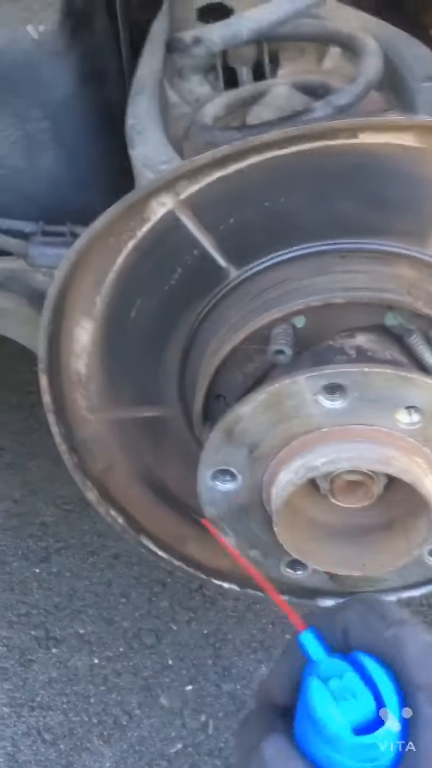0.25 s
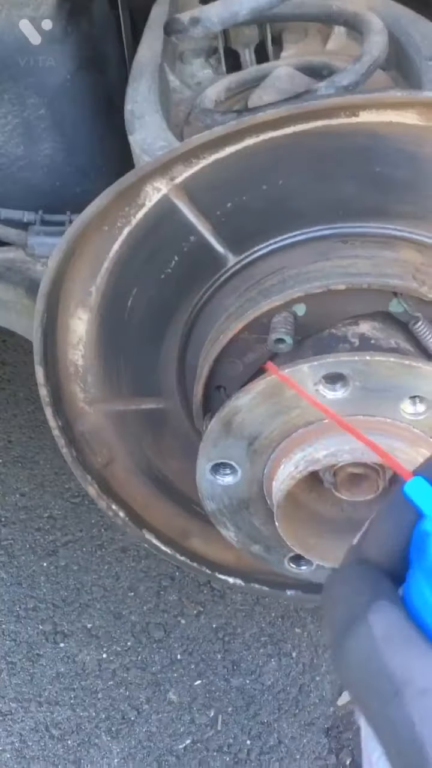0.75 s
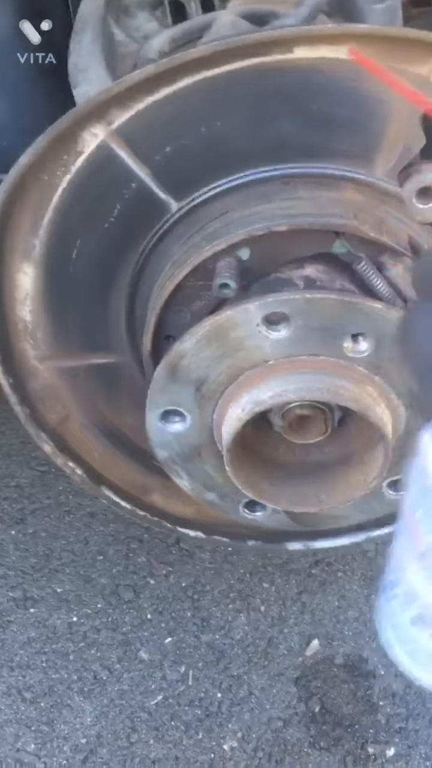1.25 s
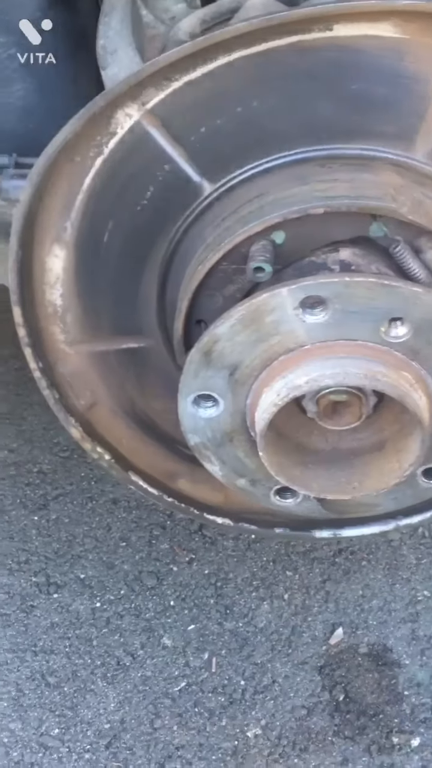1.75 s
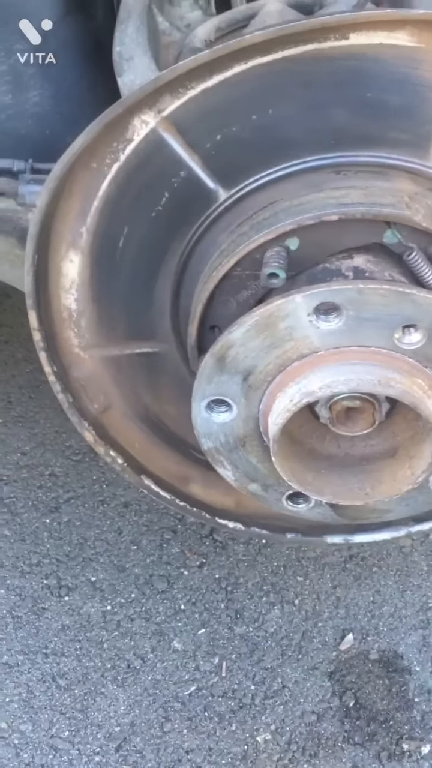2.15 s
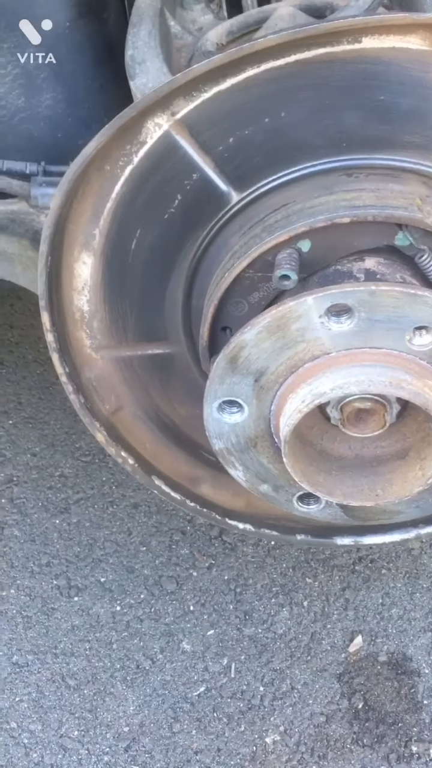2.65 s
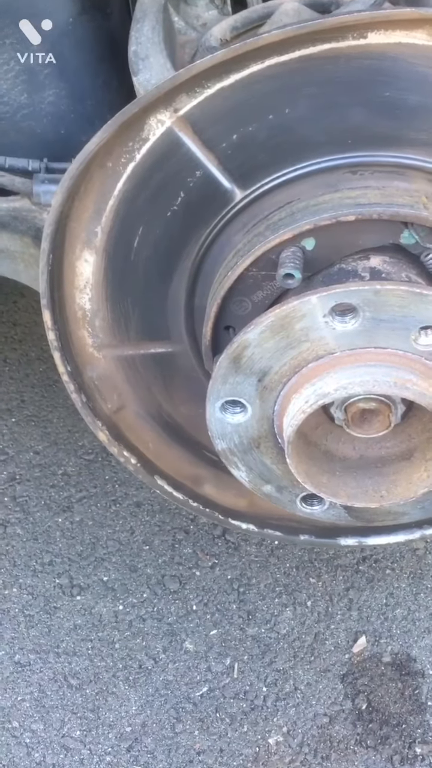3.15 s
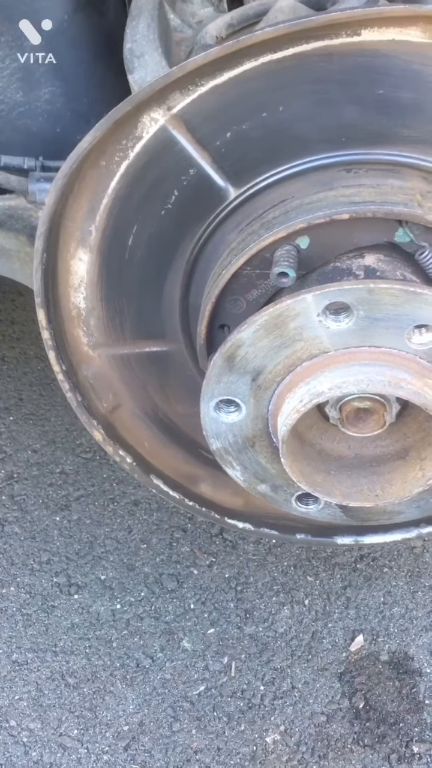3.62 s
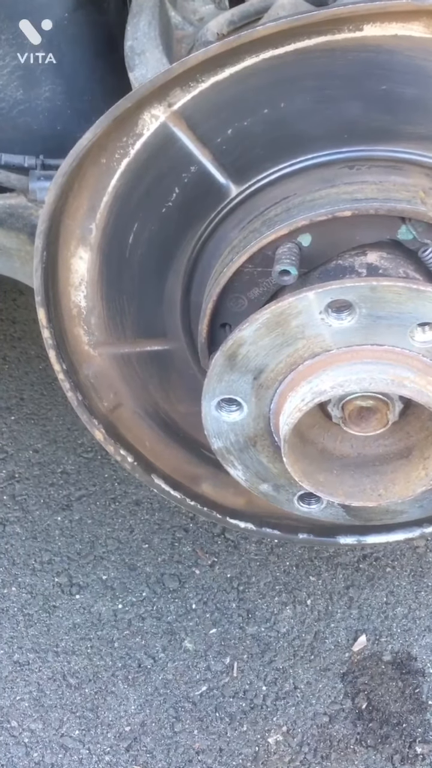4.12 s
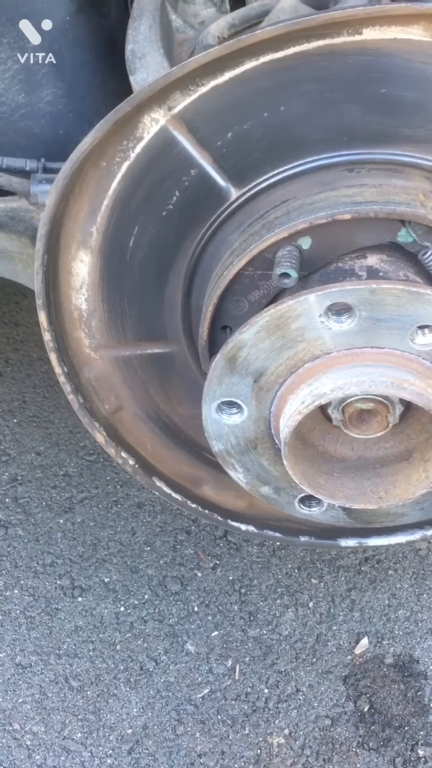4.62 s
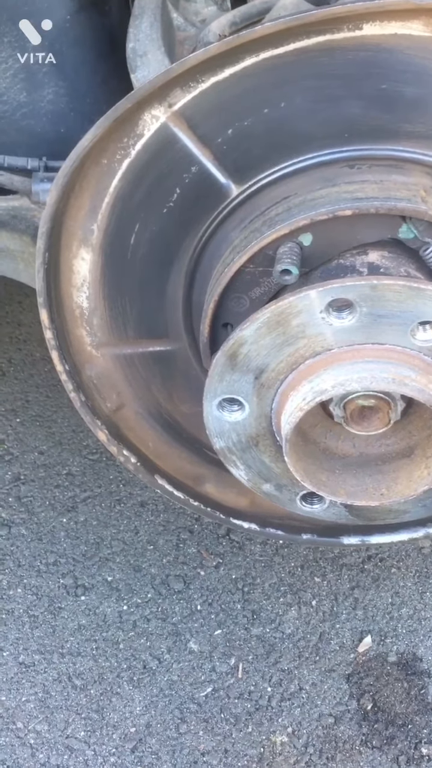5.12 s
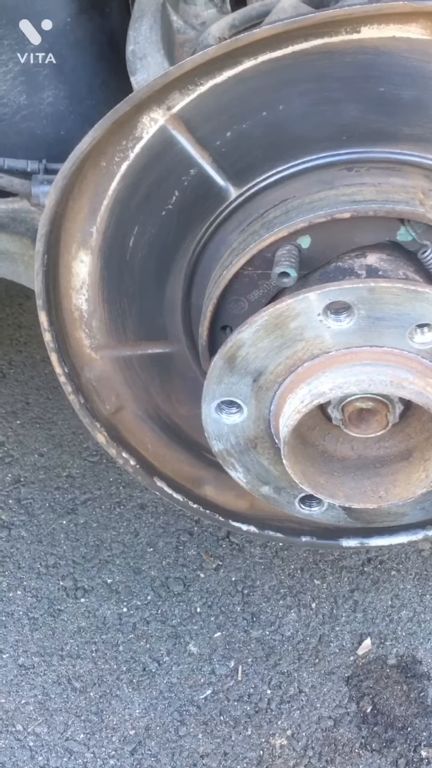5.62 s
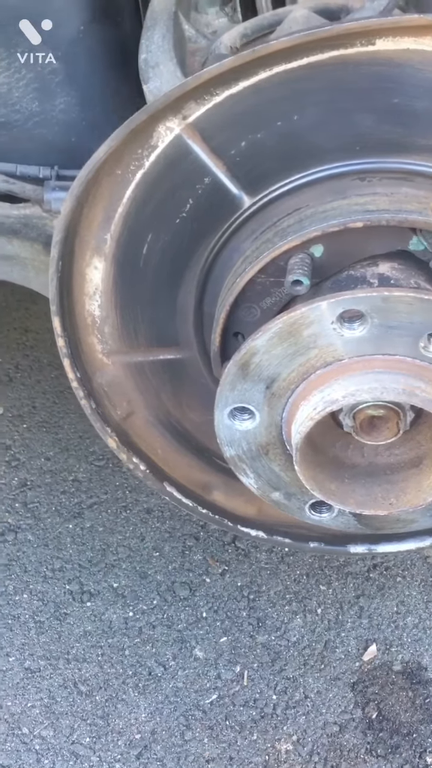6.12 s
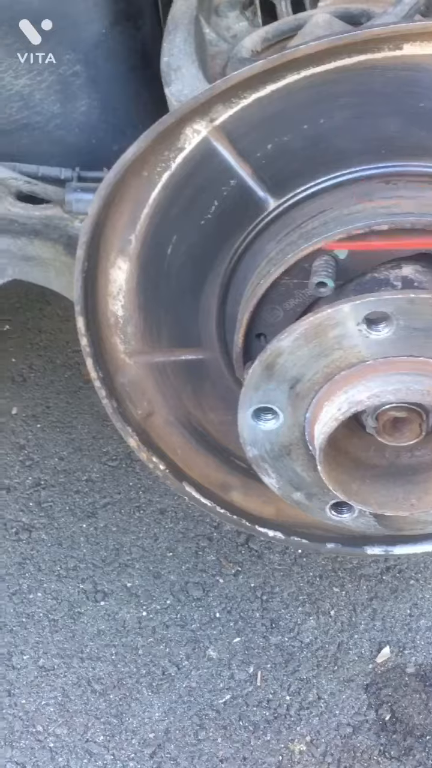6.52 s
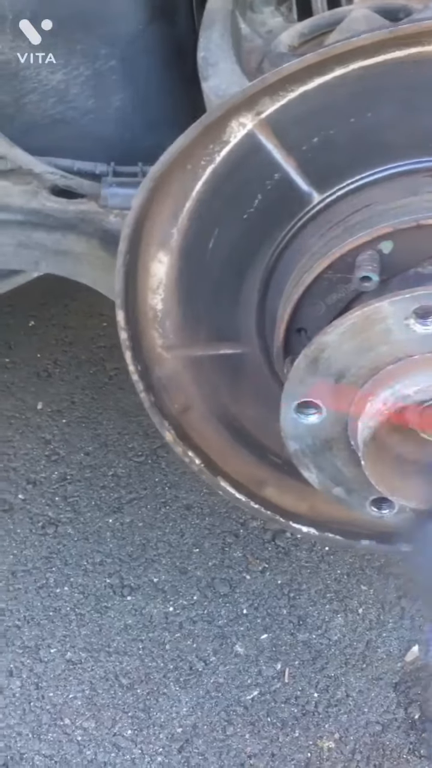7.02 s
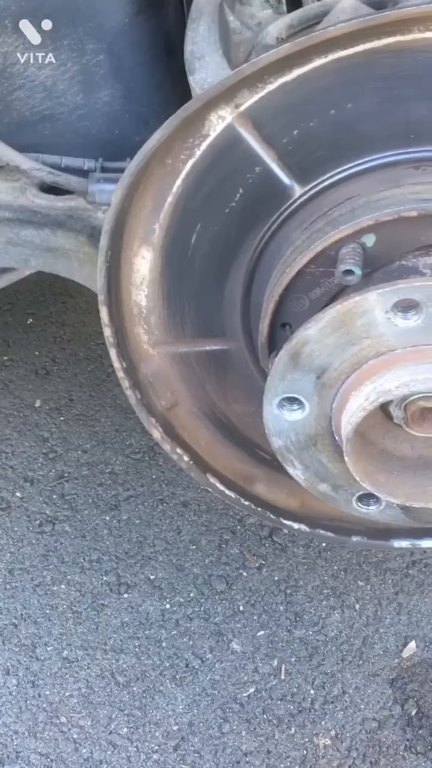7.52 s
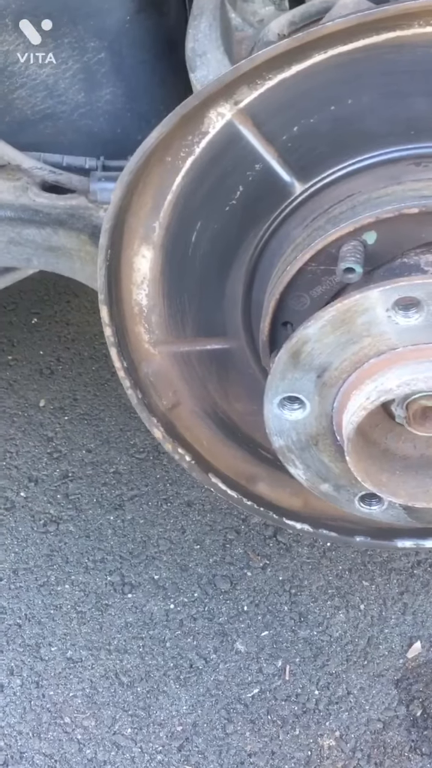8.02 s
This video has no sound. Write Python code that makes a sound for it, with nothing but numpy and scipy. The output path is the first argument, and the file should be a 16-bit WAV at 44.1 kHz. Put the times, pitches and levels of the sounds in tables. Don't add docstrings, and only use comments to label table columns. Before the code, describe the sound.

Close, loud spray can jets in quick rhythmic bursts, scouring and whistling in a metal drum, then a longer final blast over faint traffic.

```python
import sys
import numpy as np
from scipy import signal
from scipy.fft import rfft, irfft, next_fast_len
from scipy.io import wavfile
from scipy.ndimage import uniform_filter1d, map_coordinates

SR = 44100
rng = np.random.default_rng(int(sys.argv[2]) if len(sys.argv) > 2 else 0)


def level_to_linear(level):
    exponent = np.asarray(level, float) / 20
    return 10 ** exponent


def bounce(signal):
    frames = np.transpose(np.atleast_2d(signal))
    limited = np.clip(frames, -1, 1)
    pcm = np.round(limited * 32767).astype(np.int16)
    wavfile.write(sys.argv[1], SR, pcm)


N = 364266
TIME = np.arange(N) / SR

# [t/s, f/Hz,
# level/dB]
MODES = [(.14, 869, -61), (.75, 950, -59), (.75, 2363, -63), (1.08, 869, -58), (1.08, 2411, -66),
         (1.41, 2411, -65), (1.74, 1036, -60), (1.74, 1394, -60), (1.74, 3267, -58), (1.74, 2720, -61),
         (1.74, 2950, -64), (2.1, 2815, -54), (2.1, 8268, -69), (2.1, 15057, -73), (2.85, 3095, -63),
         (3.71, 7208, -66), (4.38, 5106, -68), (5.03, 1038, -60), (5.95, 5146, -66), (6.63, 985, -63),
         (6.96, 8236, -73), (6.96, 11528, -74), (6.96, 15651, -74)]


def unit(x):
    return x / np.sqrt(np.mean(x ** 2) + 1e-20)


def along(points, hz):
    f, v = np.transpose(points)
    return np.interp(np.log(hz + 1), np.log(f + 1), v)


def wobble(rate_hz):
    knots = rng.standard_normal(int(N * rate_hz / SR) + 4)
    return map_coordinates(knots, [TIME * rate_hz])


def bell(x):
    return np.exp(-.5 * x ** 2)


def bumps(rows, t):
    s, length_s, *heights = np.transpose(rows)
    return heights @ bell((t - s[:, None]) / length_s[:, None])


def filtered(x, response):
    m = next_fast_len(N + SR)
    return irfft(rfft(x, m) * response(np.fft.rfftfreq(m, 1 / SR)), m)[:N]


def resonance(f, hz, width_hz):
    return 1j * f * width_hz / (hz * hz - f * f + 1j * f * width_hz)


def rush(spectrum, patchy_db, shape=None, size=256):
    hz, s, z = signal.stft(rng.standard_normal(N), SR, nperseg=size)
    field = uniform_filter1d(rng.standard_normal(z.shape), size=3, axis=0)
    field = uniform_filter1d(field, size=14, axis=1)
    gain = level_to_linear(along(spectrum, hz))[:, None] * (shape(hz[:, None], s) if shape else 1)
    z = z * level_to_linear(patchy_db * unit(field)) * gain / np.linalg.norm(gain, axis=0)
    return unit(signal.istft(z, SR, nperseg=size)[1][:N])


def outdoors():
    # [t/s, level/dB]
    traffic_db = [(0, -34.5), (.6, -36.5), (1.2, -39), (1.8, -33.5), (2.4, -33.5), (2.8, -36.5), (3.4, -36),
                  (3.9, -34.5), (4.58, -33.5), (4.77, -43), (4.95, -35), (5.77, -39.5), (6.35, -32),
                  (6.6, -34.5), (7.04, -33), (7.4, -33), (7.9, -33), (8.26, -31.5)]
    # [f/Hz, level/dB per Hz]
    rumble_spectrum = [(15, -67), (30, -33.5), (45, -12.5), (57, -2.5), (75, -8), (110, -12.5),
                       (160, -20.5), (400, -37.5), (600, -78.5)]
    # [f/Hz, level/dB per Hz]
    air_spectrum = [(150, -3), (250, 0), (303, -14.5), (415, -3), (485, -19), (712, -9), (791, -11.5),
                    (4860, -35), (5300, -41.5), (5590, -46.5), (16200, -50.5)]
    # [t/s, level/dB]
    air_db = [
        (0, -47.5),
        (.9, -47.5),
        (1.5, -50),
        (2.3, -54),
        (3.3, -55.5),
        (3.7, -52),
        (5.0, -51),
        (6.05, -59),
        (6.67, -48),
        (7.1, -51.5),
    ]
    # [t/s, length/s, level/dB]
    chirrs = [
        (3.72, .04, 10),
        (6.36, .04, 4),
        (6.675, .04, 9),
        (7.08, .025, 6),
    ]

    def colour(points):
        return unit(filtered(rng.standard_normal(N), lambda hz: level_to_linear(along(points, hz))))

    rumble = level_to_linear(np.interp(TIME, *np.transpose(traffic_db)) + 2.0 * wobble(11)) * colour(rumble_spectrum)
    air = level_to_linear(np.interp(TIME, *np.transpose(air_db)) + 1.5 * wobble(10)) * colour(air_spectrum)
    insects = unit(filtered(rng.standard_normal(N), lambda f: resonance(f, 6950, 450) ** 2))
    insects_db = -67.5 + 1.5 * wobble(4) + bumps(chirrs, TIME)[0]
    return rumble + air + level_to_linear(insects_db) * insects


def hand():
    # [opens/s, shuts/s, straw hiss/dB, change up to the shut/dB, scour over hiss/dB]
    presses = [(-0.05, 0.124, -15, -1.5, -7), (0.256, 0.428, -10.5, -7.5, -10),
               (0.571, 0.733, -12, -1.5, -8), (0.88, 1.063, -11, -0.5, -12.5), (1.204, 1.387, -13, 0, -9),
               (1.548, 1.723, -7.5, -4, -4), (1.873, 2.086, -11.5, 0.5, -7.5),
               (2.238, 2.432, -16, -0.5, -2.5), (2.614, 2.837, -6, -7, -7.5), (2.989, 3.204, -5.5, -2, -10),
               (3.376, 3.61, -12, -0.5, -4.5), (3.764, 3.982, -10, -12, -4), (4.147, 4.359, -5, -3.5, -11),
               (4.502, 4.719, -3, -6, -11.5), (4.825, 5.014, -11.5, -1.5, -12),
               (5.101, 5.302, -6.5, -3.5, -9), (5.397, 5.599, -5.5, -3, -10), (5.739, 5.931, -7, -1, -7.5),
               (6.082, 6.28, -6.5, -3, -7), (6.419, 6.612, -13.5, -1, -8.5),
               (6.734, 6.945, -13.5, -1.5, -11), (7.18, 7.473, -13, -2.5, -9.5),
               (7.674, 8.303, -10.5, -0.5, -7.5)]
    # [howl at opening/dB, at shut/dB, buffet over howl/dB, pitch/Hz, peak height/dB]
    aims = [(-17.5, -36.5, 2, 2100, 3.5), (-28, -30, -7.5, 2900, 0.5), (-17, -21.5, -8, 1850, 11.5),
            (-31, -30.5, -2, 2100, 5), (-26, -27, -3.5, 2080, 9.5), (-12, -12.5, -13.5, 2740, 8),
            (-16, -17, -15.5, 2070, 12.5), (-12, -14.5, -18.5, 3100, 0.5), (-15, -17.5, -19.5, 2880, 14),
            (-17.5, -27.5, -17.5, 3030, 18), (-12, -20, -20, 3280, 17.5), (-16, -16.5, -17.5, 3130, 15),
            (-29.5, -23, -16, 2900, 20), (-18, -27, -15, 3060, 11.5), (-30, -29, -13, 2800, 11),
            (-24.5, -22.5, -17.5, 3080, 23.5), (-23.5, -24.5, -16.5, 2880, 13),
            (-21.5, -23.5, -17, 2630, 9.5), (-17.5, -22, -20, 2460, 13.5), (-17, -25.5, -11.5, 1930, 10.5),
            (-35.5, -32.5, -1.5, 2470, 10.5), (-29.5, -20, -6, 2180, 9), (-13, -25, -15, 2810, 16.5)]
    # [t/s, length/s, hiss/dB, howl/dB, pitch shift/octaves]
    swings = [(.572, 0.024, 2, -12, .1), (0.954, 0.048, -0.6, 9, 0.27), (1.382, 0.011, 8.5, 10.5, 0.37),
              (1.871, .01, -1, 7, -0.015), (1.982, 0.036, 0.5, -4.5, 0.12), (2.08, 0.028, 6, 2.5, 0.32),
              (2.339, 0.052, 9, -2, 0.24), (2.778, 0.039, 1, 4, 0.12), (2.81, 0.019, 5, -1.5, -0.18),
              (3.212, .01, 1, 18.5, -0.23), (3.43, .025, 7.5, -14.5, -.2), (3.983, .025, 12, -5, .05),
              (4.152, 0.024, 2.5, 15, .05), (4.368, 0.01, -6, 9, -0.22), (4.716, 0.0065, -5, 0, -.1),
              (5.095, 0.012, -2.5, -2, -0.12), (6.178, 0.024, -5.5, 2, 0.17),
              (6.422, .018, -2.5, -7.5, .05), (7.209, 0.014, 8, 2.5, -0.48),
              (7.273, 0.023, 3.5, -3.5, -0.36), (7.342, 0.04, 3, 7, 0.26), (7.677, 0.049, 1.2, 1, -0.42),
              (7.96, 0.019, -1.5, 0, -0.012), (8.026, .026, -5.5, 4, 0.085), (8.095, 0.023, 5.5, 0.5, 0.1)]
    # [t/s, length/s, scour/dB, buffet/dB]
    glances = [
        (0.014, 0.024, -5.5, 5.5),
        (1.564, 0.026, 4, 6),
        (2.644, 0.019, 7.5, -5.5),
        (3.52, 0.082, -1, 3.5),
        (3.599, 0.022, 7.5, 1.5),
        (4.497, 0.008, 3, 1),
        (7.21, 0.036, -1.5, -11.5),
        (7.666, 0.024, -4, 9.5),
        (3.4, 0.027, 0.5, -6),
        (8.047, 0.022, 6.5, -5),
    ]
    # [t/s, length/s, level/dB]
    eases = [
        (0.253, .005, -3.5),
        (1.538, 0.0047, -1.5),
        (4.823, .006, -3),
        (6.068, .005, -10),
        (4.72, 0.013, -7),
        (5.598, .014, -4.5),
        (5.931, 0.013, -2.5),
        (6.28, 0.0074, -4.5),
    ]
    # [t/s, length/s, level/dB]
    weeps = [
        (.243, 0.0054, 18),
        (1.537, .006, 12),
        (2.978, .005, 8),
        (6.395, .01, 9),
        (6.71, .01, 12),
        (7.01, .06, 8),
        (7.135, 0.011, 12),
        (7.163, 0.0069, 14),
    ]
    leak_db = [-66, -64.5, -73, -65.5]
    open_db_per_s, shut_db_per_s, corner_s = 2501, 1456.5, 0.0034
    seep_db, seep_db_per_s, lead_s = -37, 753, 0.004
    whisper_db, whisper_db_per_s = -21.5, 1299.5
    linger_db, linger_db_per_s = [-59.5, -54, -44, -25], 161.5
    scour_follows, buffet_follows = 0.54, 0.56
    peak_db_per_octave = 17.5

    t = np.arange(0, N / SR, .001)
    opens, shuts = np.transpose(presses)[:2]
    press = np.searchsorted((shuts[:-1] + opens[1:]) / 2, t)
    (opens, shuts, hiss_db, change_db, scour_db,
     first_db, last_db, buffet_db, hz, peak_db) = np.hstack([presses, aims])[press].T
    done = np.clip((t - opens) / (shuts - opens), 0, 1)
    since_open = np.abs(t - opens)

    hiss_move, howl_move, octaves = bumps(swings, t)
    scour_move, buffet_move = bumps(glances, t)
    buffet_move -= 0.5 * np.exp(-since_open / 0.0088)
    settling_db = -1.5 * np.exp(-since_open / 0.046)
    hiss_db = hiss_db + change_db * done + hiss_move
    howl_move = howl_move + (last_db - first_db) * (done - .5)
    mean_db = (first_db + last_db) / 2
    levels = np.array([
        hiss_db,
        hiss_db + scour_db + scour_follows * howl_move + settling_db + scour_move,
        mean_db + howl_move,
        mean_db + buffet_db + buffet_follows * howl_move + buffet_move]) + bumps(eases, t)[0]

    before, after = np.maximum(opens - lead_s - t, 0), np.maximum(t - shuts, 0)
    valve_db = np.maximum(-open_db_per_s * before, seep_db - seep_db_per_s * before) - shut_db_per_s * after
    corner = bell(np.arange(-40, 41) / 1000 / corner_s)
    valve_db = np.convolve(np.pad(valve_db, 40, "edge"), corner / corner.sum(), "valid")
    linger = level_to_linear(np.c_[linger_db] - linger_db_per_s * after) * (t > opens)
    gains = level_to_linear(levels) * (level_to_linear(valve_db) + linger) + level_to_linear(np.c_[leak_db] + bumps(weeps, t))
    gains[0] += level_to_linear(levels[0] + whisper_db - whisper_db_per_s * before - shut_db_per_s * after)
    return [np.interp(TIME, t, g) for g in gains], (t, hz * 2 ** octaves, peak_db + peak_db_per_octave * octaves)


def jet():
    # [t/s, surge/dB, length/s, thump/dB, thump
    # f/Hz]
    edges = [(0.115, 0, 0.015, -27.5, 790), (0.313, 10.5, 0.0046, -8, 900), (0.328, 11.5, 0.008, -26, 95),
             (0.419, 6, 0.0037, -19, 1850), (1.1, -2, 0.046, -46, 220), (3.379, 3.5, 0.021, -36.5, 910),
             (4.345, 1, 0.06, -48.5, 200), (4.588, -3, 0.034, -27, 600), (4.698, 3, 0.004, -40, 800),
             (4.81, 4, 0.0021, -45, 900), (4.993, 4, 0.003, -20, 1500), (5.147, 3.5, 0.033, -36, 450),
             (6.224, 0.5, 0.0045, -50, 905), (6.333, -5, 0.0098, -46, 160), (6.761, 2, 0.016, -29, 620),
             (6.815, 0.5, 0.039, -29.5, 600), (6.913, 5, 0.006, -40, 888), (6.932, 3, 0.01, -45, 887),
             (7.207, -7, 0.031, -26, 1730), (7.342, -3.5, 0.021, -26.5, 148), (8.011, 2, 0.004, -33, 900),
             (8.035, 4, 0.0055, -34, 886)]
    # [t/s, half length/s, level/dB]
    coils = [(7.39, .09, -7), (7.319, .005, 8), (7.334, .004, 15), (7.345, .005, 15), (7.360, .004, 13),
             (7.371, .005, 13), (7.392, .011, 11), (7.414, .005, 11), (7.424, .005, 10), (7.444, .008, 12),
             (7.468, .006, 8)]
    # [f/Hz, level/dB per Hz]
    hiss_spectrum = [(5000, -44), (7500, -9.5), (8500, -6), (10600, -1), (13700, 0), (15000, 2),
                     (16500, -3.5)]
    scour_spectrum = [(2120, -26), (3600, -10.5), (3890, -5.5), (4130, -12), (5470, -1.5), (6950, -2),
                      (7570, -5.5), (10000, -4), (13000, -48.5), (22000, -120)]
    howl_spectrum = [(900, -36), (1350, -8), (2000, -4), (3800, -5.5), (4600, -7.5), (6500, -43)]
    buffet_spectrum = [(120, -42.5), (200, -5), (450, -10), (643, -1), (1290, 0), (1760, -5), (1900, -22),
                       (2470, -25.5), (4180, -120)]
    thump_spectrum = [(40, -30), (90, 0), (2500, 0), (6000, -30)]

    (hiss_gain, scour_gain, howl_gain, buffet_gain), (aim_s, hollow_hz, peak_db) = hand()
    surge_db, thump_gain = 0.25 * wobble(35) + 0.45 * wobble(160), np.zeros(N)
    for at, db, length_s, thump_db, _ in edges:
        bump = bell((TIME - at) / np.where(TIME < at, 0.59 * length_s, 0.9 * length_s))
        surge_db += db * bump
        thump_gain += level_to_linear(thump_db) * bump
    coil_db = sum(db * np.exp(-((aim_s - s) / half_s) ** 4) for s, half_s, db in coils)
    coil_db = np.interp(TIME, aim_s, coil_db)

    def hollow(hz, t):
        octave_ratio = np.abs(np.log((hz + 1) / np.interp(t, aim_s, hollow_hz)))
        return level_to_linear(np.interp(t, aim_s, peak_db) * np.exp(-octave_ratio / 0.58))

    edge_s, *_, thump_hz = np.transpose(edges)

    def lip(hz, t):
        return bell(np.log((hz + 1) / np.interp(t, edge_s, thump_hz)) / 0.6)

    sound = hiss_gain * rush(hiss_spectrum, patchy_db=2.0) * level_to_linear(0.3 * coil_db)
    sound += scour_gain * rush(scour_spectrum, patchy_db=3.0, size=512) * level_to_linear(0.58 * coil_db)
    howl = rush(howl_spectrum, patchy_db=3.2, shape=hollow, size=1024)
    sound += howl_gain * howl * level_to_linear(coil_db + 0.8 * wobble(60))
    buffet = rush(buffet_spectrum, patchy_db=1.36, size=1024)
    sound += buffet_gain * buffet * level_to_linear(0.72 * coil_db + 1.3 * wobble(40))
    return level_to_linear(surge_db) * sound + thump_gain * rush(thump_spectrum, patchy_db=1, shape=lip, size=512)


def aimed(blast):
    # [t/s, length/s, f/Hz, width/Hz, level/dB]
    steel_bands = [(0.03, 0.065, 1490, 150, -5.5), (.33, .08, 450, 119.4, -8), (.65, 0.078, 3245, 49.9, 12),
                   (.65, .08, 2570, 49.7, 8), (.65, .08, 4000, 500, -1.5), (0.972, .09, 2670, 100, 6),
                   (8.0, .04, 1100, 200, 6.5), (1.3, .09, 4280, 60.2, 11), (1.3, .09, 1400, 50.4, 5.5),
                   (1.58, 0.026, 2760, 90, 8.5), (1.589, 0.032, 2280, 89.8, 10.5), (1.7, .03, 2710, 90, 4.5),
                   (1.639, 0.072, 3810, 59.7, 0.5), (1.64, .09, 3350, 80, -8.5), (1.64, .09, 5480, 60.1, 2),
                   (1.98, .1, 2634, 50.4, 3.5), (2.322, 0.097, 3467, 90, 6.5), (2.34, .1, 3940, 253, -4.5),
                   (2.757, 0.029, 2950, 199, 6.5), (2.716, 0.11, 6110, 60, 8.5), (3.099, .1, 2960, 50, 4.5),
                   (3.1, .1, 3900, 60, 6), (3.1, 0.092, 7000, 60, 7), (3.49, .1, 4540, 60, 7),
                   (3.87, .1, 5470, 60.4, 9), (4.61, .1, 2970, 50, 2.5), (4.61, .1, 3850, 60, 6),
                   (4.606, .1, 4770, 60, 6), (4.92, .09, 3460, 60, 4), (5.502, .1, 5460, 59.4, 7),
                   (5.84, .1, 3480, 60, 9), (6.18, .1, 6730, 60, 6), (6.52, .1, 3200, 60, 8),
                   (6.52, .1, 4300, 600, -5), (6.93, .012, 13000, 3000, 3), (7.37, .06, 2700, 500, -0.5),
                   (8.032, .03, 3050, 70, 12), (8.0, 0.028, 9500, 2000, -2), (8.085, 0.011, 7500, 1500, 4.5),
                   (8.114, .015, 15140, 1506, 6),
                   (0.048, .05, 1000, 200, -0.5), (3.5, .1, 4800, 300, 2), (6.84, .1, 510, 230, 5.5),
              (7.21, .025, 1800, 480, 5.5), (7.25, 0.061, 700, 230, -6), (7.2, 0.11, 490, 250, -0.5),
              (8.17, 0.08, 7900, 1100, 2), (1.58, .04, 2800, 200, 2), (3.85, .06, 3100, 230, 3.5),
              (3.1, .1, 8053, 60, 9.5), (3.12, .1, 13265, 50, 3), (7.9, .07, 530, 160, -8),
              (5.2, .1, 15000, 50, 13), (1.64, .09, 8053, 60, 5.5), (1.98, .1, 8100, 60, 1),
              (6.18, .1, 7343, 60, 11), (1.63, 0.041, 540, 250, -5), (4.2, .1, 6223, 60, 1),
              (5.7, .1, 1090, 50, 7), (8.15, .04, 4330, 680, 9.5), (8.1, .1, 6481, 60, 4),
              (2.34, .1, 4500, 60, 1), (7.1, .02, 1880, 60, -7), (7.85, .1, 13287, 50, 5),
              (1.8, .1, 9233, 60, 5), (8.08, .02, 2900, 200, 4.5), (8.055, .012, 6900, 1200, -3),
              (8.25, .02, 4000, 2200, -3), (7.97, .03, 4900, 800, -4.5), (8.12, .015, 5900, 1500, -4),
              (.03, .02, 2400, 500, 2), (.015, .015, 1400, 250, 3.5), (7.205, .015, 1900, 70, -12),
              (7.205, .015, 2300, 200, 3.5), (7.89, 0.033, 3000, 300, 4.5), (.97, .09, 2360, 80, -4),
              (1.28, .09, 2400, 80, -4.5), (4.7, .04, 1150, 200, -2), (8.2, .05, 1800, 190, -3),
              (7.992, .008, 3000, 400, 1)]
    hz, s, z = signal.stft(blast, SR, nperseg=1024, noverlap=768)
    at, length_s, centre_hz, width_hz, db = np.transpose(steel_bands)
    bands = bell((hz[:, None] - centre_hz) / width_hz)
    moments = bell((s - at[:, None]) / length_s[:, None])
    return signal.istft(z * level_to_linear((bands * db) @ moments), SR, nperseg=1024, noverlap=768)[1][:N]


def steel(blast):
    # [f/Hz, width/Hz, level/dB]
    drum_bands = [(1879, 42, 9), (2456, 120, 4), (3158, 35, 5), (3398, 40, 7), (6170, 170, 2),
                  (10180, 190, -1.5), (13600, 60, -6.5), (1460, 48, 5.5), (2948, 370, 4), (4550, 120, 3.5),
                  (7640, 190, -5), (10460, 510, -6.5)]

    def drum(f):
        return 1 + sum((level_to_linear(db) - 1) * resonance(f, hz, width_hz) for hz, width_hz, db in drum_bands)

    def thin(f):
        return sum(resonance(f, hz, 15) * 3000 / (3000 + hz) for _, hz, _ in MODES)

    return level_to_linear(-1.77) * filtered(blast, drum) + level_to_linear(-13.0) * filtered(blast, thin)


def yard(x):
    # [f/Hz, t60/s]
    decay = [(300, .3), (2000, 0.38), (8000, 0.26), (16000, 0.18)]
    hz, t, z = signal.stft(rng.standard_normal(SR // 2), SR, nperseg=256)
    tail = signal.istft(z * level_to_linear(-60 * t / along(decay, hz)[:, None]), SR, nperseg=256)[1]
    return signal.fftconvolve(x, tail / np.linalg.norm(tail))[:N]


def whistles():
    # [t/s, length/s, f/Hz, level/dB]
    pockets = [(0.01, .003, 1000, -16), (0.017, 0.0043, 947, -16), (0.11, .006, 700, -24),
               (7.336, 0.0018, 3000, -9), (7.346, .0025, 2410, -7), (7.392, 0.0041, 2990, -6),
               (8.026, .006, 3060, -7.5), (8.006, .001, 3000, -5), (8.011, 0.0018, 3130, -3),
               (8.036, .004, 3100, -3.5), (8.048, .002, 2880, -9)]
    drift = 2 * np.pi * np.cumsum(60 * wobble(300)) / SR
    out = np.zeros(N)
    for s, length_s, hz, db in pockets:
        out += level_to_linear(db) * bell((TIME - s) / length_s) * np.sin(2 * np.pi * hz * TIME + drift)
    return out


def rings():
    lead_s = 0.1
    out, t, waver_db = np.zeros(N), TIME[:SR // 2] - lead_s, 1.2 * wobble(40)
    for s, hz, db in MODES:
        fade_db = np.where(t < 0, 900 * t, -70 * t)
        start = round((s - lead_s) * SR)
        level_db = db + 7 + fade_db + waver_db[start:][:len(t)]
        out[start:][:len(t)] += level_to_linear(level_db) * np.sin(2 * np.pi * hz * t)
    return out


def pops():
    # [t/s, level/dB, first f/Hz, last f/Hz, drop/s]
    pockets = [
        (.311, -12, 1400, 110, 0.00393),
        (4.703, -24.5, 2000, 150, 0.003),
        (4.993, -19, 2800, 1800, .0015),
        (4.993, -23, 970, 700, .0015),
        (7.315, -29, 520, 120, 0.0064),
        (7.329, -26, 910, 120, 0.0055),
        (7.36, -21, 286, 80, 0.0092),
        (6.774, -23.5, 230, 80, .006),
        (6.773, -22, 750, 610, 0.0032),
        (6.75, -26, 800, 540, .004),
    ]
    out, t = np.zeros(N), TIME[:SR // 4]
    for s, db, first_hz, last_hz, drop_s in pockets:
        hz = last_hz + (first_hz - last_hz) * np.exp(-t / drop_s)
        fade_db = -60 * t / (19 * drop_s)
        out[round(s * SR):][:len(t)] += level_to_linear(db + fade_db) * np.sin(2 * np.pi * np.cumsum(hz) / SR)
    return out


def ticks():
    # [t/s, crack/dB, ring under it/dB]
    touches = [
        (4.055, -27.5, -43),
        (7.109, -2, -27.5),
    ]
    # [f/Hz, level/dB, t60/s]
    spring = [(5146, -3, .75), (8290, -10, .14), (11570, -1, .26), (15650, -12, .3)]
    out, t = np.zeros(N + SR), TIME[:SR]
    for s, db, ring_db in touches:
        ring = sum(level_to_linear(level_db - 60 * t / t60_s) * np.sin(2 * np.pi * hz * t) for hz, level_db, t60_s in spring)
        fall = level_to_linear(-60 * t / 0.00083) + 0.59 * level_to_linear(-60 * t / 0.05)
        crack = fall * signal.lfilter([1, -.8], 1, rng.standard_normal(len(t)))
        out[round(s * SR):][:len(t)] += level_to_linear(db) * (level_to_linear(ring_db) * ring + 0.29 * crack)
    return out[:N]


def scene():
    near = steel(aimed(jet())) + pops() + rings() + ticks()
    return np.tile(near + level_to_linear(-34.5) * yard(near) + outdoors() + whistles(), (2, 1))


def low_pass(x):
    return signal.sosfilt(signal.butter(12, 16350, fs=SR, output="sos"), x)


def record(dry):
    top_hz, edge_hz = 15870, 150
    clipped = dry / (1 + np.abs(dry / 0.96) ** 12) ** (1 / 12)
    heard = np.array([filtered(x, lambda hz: np.clip((top_hz - hz) / edge_hz, 0, 1) ** 2) for x in clipped])
    return low_pass(heard)


dry = scene()
out = record(dry)
bounce(out)
```